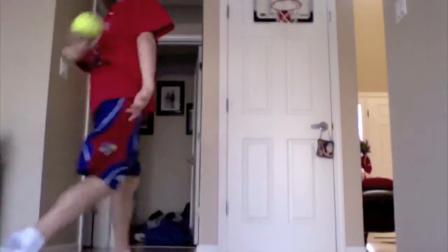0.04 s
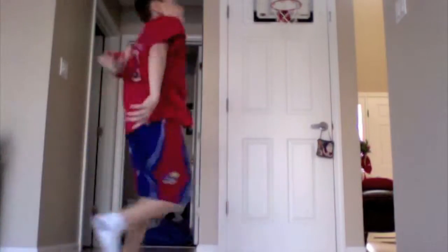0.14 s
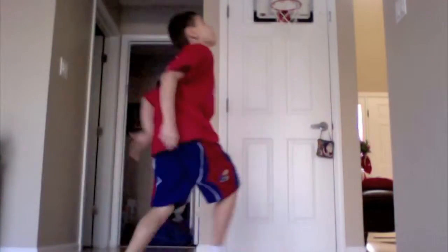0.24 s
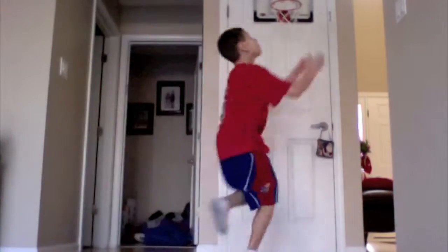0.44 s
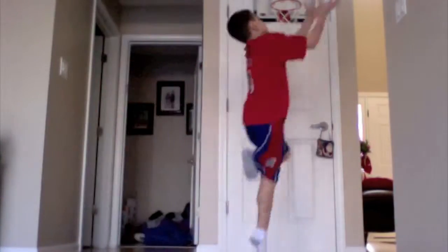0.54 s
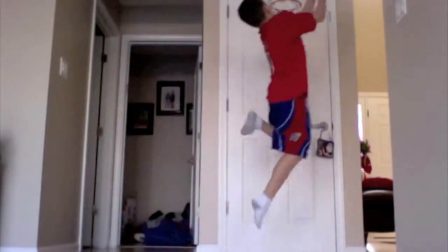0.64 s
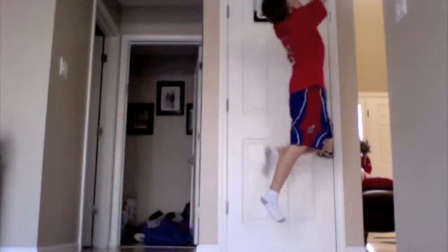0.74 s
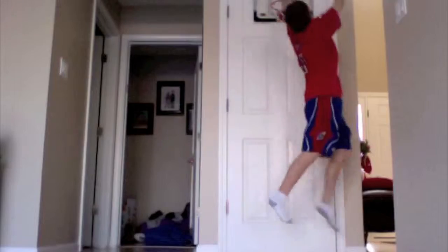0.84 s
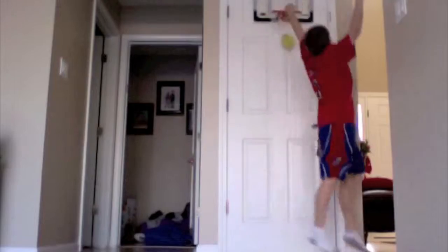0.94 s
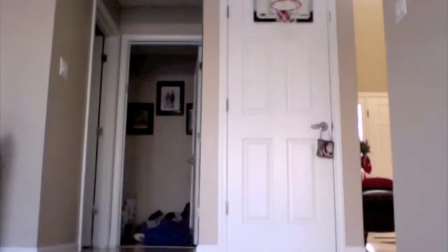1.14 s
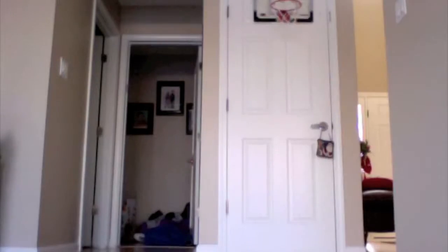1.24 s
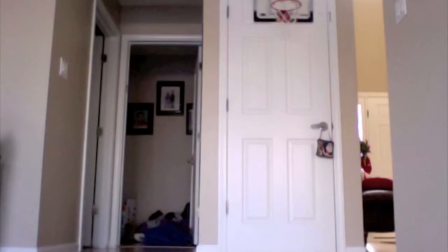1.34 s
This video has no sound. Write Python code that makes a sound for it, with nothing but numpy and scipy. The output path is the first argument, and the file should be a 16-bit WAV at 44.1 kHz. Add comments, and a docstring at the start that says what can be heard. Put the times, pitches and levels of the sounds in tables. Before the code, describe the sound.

Quick footfalls thump across floorboards, ending in a brief hoop rattle and a landing thud.

```python
"""Over a faint room tone, a boy in socks thuds up a wooden floor, jumps and dunks a small ball
into a hoop hung on a door. Each foot pushes the floorboards into ringing; the steel rim, backboard
and door rattle until he lands, and the hallway rings with every blow. Small squeaks, snaps and
knocks dot the action. It cuts off just after the landing and the quiet room fades back in,
with a faint hiss."""
import sys
import numpy as np
from scipy import signal
from scipy.fft import rfft, irfft, next_fast_len
from scipy.io import wavfile

SR = 44100
rng = np.random.default_rng(int(sys.argv[2]) if len(sys.argv) > 2 else 0)


def wav_record(signal):
    """Record a signal, one row per channel, as 16-bit PCM in the file named by sys.argv[1]."""
    frames = np.transpose(np.atleast_2d(signal))
    bounded = np.clip(frames, -1, 1)
    # unit amplitude maps onto the largest positive 16-bit level
    quanta = np.round(bounded * 32767).astype(np.int16)
    wavfile.write(sys.argv[1], SR, quanta)


N = 61739
T = np.arange(N) / SR

# room tone colour: f/Hz, level/dB
ROOM_EQ = [(25, -25), (50, -13), (90, -4), (210, 0.5), (265, -5.5), (320, -4.5), (400, -16), (650, -15),
           (900, -22.5), (2200, -26.5), (3100, -23), (4200, -30), (7000, -32.5), (10000, -43.5),
           (15000, -55)]
# room tone ride, ahead of the bed fader: t/s, level/dB
ROOM_RIDE = [(0, -64.5), (.4, -59.5), (.9, -65), (1.2, -51.5), (1.4, -52)]
# swells of hiss: t/s, length/s, level/dB, centre f/Hz, width/octaves
SWISH_CUES = [(0.146, 0.091, -74, 6930, 0.057), (0.259, .17, -76.5, 4530, 0.89),
              (0.524, 0.05, -62.5, 3000, .05), (0.532, .18, -66, 2780, 0.81),
              (1.118, 0.15, -56, 3350, 0.15), (1.178, .3, -62.5, 2430, 0.83), (1.219, .14, -60, 3000, 0.15),
              (1.344, 0.048, -57, 5060, 0.045)]
# hallway decay: f/Hz, t60/s
HALL_DECAY = [(60, 0.63), (200, 0.56), (600, 0.36), (2000, 0.41), (5000, 0.39), (10000, 0.17),
              (16000, 0.057)]
# soles slapping the boards: t/s, level/dB, low-pass f/Hz
SLAP_CUES = [(.150, -92, 3500), (.214, -41.5, 1190), (.240, -50.5, 2550), (0.254, -58, 7050),
             (0.271, -54, 7000), (0.41, -31.5, 1040), (0.4168, -32, 3260), (0.429, -38.5, 9200),
             (1.078, -38.5, 11900), (1.091, -52, 6000)]
# slap colour: f/Hz, level/dB
SOLE_EQ = [(100, -19.5), (600, 11), (1200, -3), (2000, -0.5), (3000, 3), (4200, -3.5), (7000, -3.5),
           (10000, -19), (15000, -46.5)]
# footfalls: t/s, level/dB, contact/s, patch of floor
THUDS = [(.153, -31.5, 0.0028, "run-up"), (0.188, -44, 0.0053, "run-up"), (0.2153, -24, 0.002, "run-up"),
         (0.226, -34.5, 0.0013, "run-up"), (.249, -26, 0.0063, "run-up"), (.416, -11.5, 0.0029, "take-off"),
         (0.4254, -14, .003, "take-off"), (.436, -15, 0.0047, "take-off"), (.572, -38, .008, "take-off"),
         (1.071, -15.5, 0.0017, "landing"), (1.0754, -5, 0.0018, "landing"),
         (1.095, -24.5, 0.0018, "landing")]
# floorboard modes under the run-up, at take-off and by the door: f/Hz, level/dB, t60/s
RUN_UP_MODES = [(61.7, -14.5, 0.15), (93.9, -5.5, 0.35), (118.5, -2, 0.23), (173.6, -1.5, .17),
                (314, -13.5, 0.16), (610, -35, 0.11)]
TAKE_OFF_MODES = [(72.2, -15, 0.63), (99.5, -15.5, 0.54), (112, -2, 0.11), (153.2, -1.5, 0.14),
                  (216.7, -13.5, 0.38), (284.1, -9, 0.32)]
LANDING_MODES = [(155.4, -5.5, 0.15), (201.5, 1.5, 0.066), (388, -14.5, 0.052), (450, -9, 0.033),
                 (570, -18, 0.074), (647, -18, 0.36)]
# colour of the hallway's boom on the steps and on the landing: f/Hz, level/dB
STEP_BOOM_EQ = [(30, -31.5), (60, -10.5), (105, 2), (170, -2), (290, -4), (380, -15), (650, -20),
                (1100, -43.5), (3000, -65)]
LANDING_BOOM_EQ = [(40, -33.5), (90, -15), (190, 11), (300, -15), (450, -3), (700, -2.5), (1000, -18),
                   (1400, -14), (3000, -35.5)]
# squeaks and snaps: t/s, level/dB, centre f/Hz, width/octaves, reverb send/dB
SNAP_CUES = [(.213, -42.5, 2900, 0.16, -26.5), (.252, -39, 3530, 0.092, -29),
             (0.256, -48.5, 1310, 0.12, -20), (0.272, -43, 1384, .06, -30), (0.413, -23.5, 2870, 0.16, -24),
             (0.4265, -33.5, 9500, 0.092, -28), (0.6592, -39, 7620, 0.13, -31.5),
             (0.664, -38, 4070, 0.88, -23.5), (1.0715, -23, 11300, 0.31, -31),
             (1.065, -27, 4250, 0.31, -20.5)]
# light knocks as he takes off: t/s, level/dB
KNOCK_CUES = [(.597, -46), (.659, -37.5)]
# knock colour: f/Hz, level/dB
KNOCK_EQ = [(50, -9), (110, 0.5), (300, -13), (420, -2.5), (750, -0.5), (1100, -13), (1750, -16.5),
            (4000, -23), (12000, -60)]
# ring of a knock: f/Hz, level/dB, t60/s
KNOCK_MODES = [(554, -3, 0.15), (785, -9.5, 0.21), (1714, -21.5, 0.32)]
# hoop on the door: t/s, clatter level/dB, board level/dB, rim level/dB, favoured board f/Hz
RATTLE_CUES = [(0.9591, -29, -31, -41, 630), (0.9697, -39, -28, -40, 450),
               (0.9831, -33.5, -27.5, -43.5, 402), (0.993, -43.5, -29.5, -43.5, 114),
               (1.009, -31, -47, -42.5, 174), (1.023, -34, -31, -43.5, 292), (1.034, -55, -36, -52.5, 575),
               (1.051, -35.5, -45, -60, 570), (1.066, -26, -37.5, -50, 256)]
# clatter colour: f/Hz, level/dB
CLATTER_EQ = [(60, -26), (150, 17), (350, 6), (650, 8.5), (1000, -1.5), (1600, 2.5), (3000, -1), (5200, -4),
              (8500, -8.5), (12000, -22.5), (15500, -37)]
# modes of backboard and door, and of the steel rim: f/Hz, level/dB, t60/s
BOARD_MODES = [(111, 2, 0.15), (178, 0, .12), (318.6, 5, .3), (447, 2, 0.098), (575, -14, 0.42),
               (630, -0.5, 0.14)]
RIM_MODES = [(1144, -10.5, 0.52), (1452, 5, .14), (1675, -1.5, 0.12), (1920, -4, 0.16), (2023, -7.5, 0.19),
             (2263, 1, .18), (2790, -11, 0.26), (3770, -11, 0.29), (4470, -11.5, 0.27), (5090, -7, 0.24),
             (5950, -5.5, 0.15), (6640, -18.5, 0.17), (7600, -8, 0.077)]
# faders that cut the action off and briefly duck the quiet bed: t/s, level/dB
ACTION_FADER = [(1.10, -3), (1.12, -16), (1.128, -39), (1.14, -85)]
BED_FADER = [(1.11, 2.5), (1.13, -20.5), (1.155, -8), (1.2, -4.5)]

CONTACT_RISE_S, HALL_BUILD_S = 0.00066, 0.0027
GRIT_DB, GRIT_GRAIN_S = 3.5, 0.0007


def amp(db):
    """Decibels to gain."""
    return 10 ** (np.asarray(db) / 20)


def unit(x):
    """Scales to rms 1."""
    return x / np.sqrt(np.mean(x ** 2) + 1e-20)


def read(points, hz):
    """Reads a table on a log-frequency axis."""
    f, value = np.transpose(points)
    return np.interp(np.log(hz + 1), np.log(f + 1), value)


def fader(points):
    """Gain over time from points of t/s, level/dB."""
    return amp(np.interp(T, *np.transpose(points)))


def add(mix, s, sound):
    """Mixes a sound in at time s."""
    part = mix[max(round(s * SR), 0):][:len(sound)]
    part += sound[:len(part)]


def cut(x, hz, kind, order=3):
    """Low-pass or high-pass."""
    return signal.sosfilt(signal.butter(order, hz, kind, fs=SR, output="sos"), x)


def noise(eq, envelope=1):
    """Enveloped noise through a minimum-phase EQ, so nothing rings ahead of an attack."""
    size = next_fast_len(N + SR // 4, True)
    hz = abs(np.fft.fftfreq(size, 1 / SR))
    log_gain = np.log(unit(amp(np.maximum(read(eq, hz), -100))))
    response = np.conj(np.exp(signal.hilbert(log_gain)))[:size // 2 + 1]
    white = rng.standard_normal(N) * envelope
    return irfft(rfft(white, size) * response, size)[:N]


def bell(centre_hz, octaves):
    """EQ curve with a single peak."""
    hz = np.geomspace(20, SR / 2, 600)
    offset = np.log2(hz / centre_hz) / octaves
    return np.c_[hz, -40 * np.log10(1 + offset ** 2 / 2)]


def attack(rise_s):
    """Exponential rise from silence."""
    return 1 - np.exp(-T / rise_s)


def decay(t60):
    """Falls 60 dB in t60 seconds."""
    return np.exp(-np.log(1000) * T / t60)


def ring(modes):
    """Struck modes dying away."""
    return sum(amp(db) * decay(t60) * np.sin(2 * np.pi * hz * T) for hz, db, t60 in modes)


def room_tone():
    """A dark bed of air that drifts in level."""
    return noise(ROOM_EQ) * fader(ROOM_RIDE)


def swishes(fade_s=0.0066):
    """Faint bands of hiss that fade in, hold and fade out."""
    out = np.zeros(N)
    for s, length, db, hz, octaves in SWISH_CUES:
        swell = np.clip(np.minimum(T, length - T) / fade_s, 0, 1)
        add(out, s, amp(db) * swell * noise(bell(hz, octaves)))
    return cut(out, 9500, "lowpass")


def hallway(eq):
    """The hallway's answer to a blow: the tail builds quickly and its top end dies first."""
    hz, t, spectrum = signal.stft(noise(eq), SR, nperseg=512)
    damping = amp(-60 * t / read(HALL_DECAY, hz)[:, None])
    tail = signal.istft(spectrum * damping, SR, nperseg=512)[1][:N]
    return tail * attack(HALL_BUILD_S)


def contact(eq, t60, send_db):
    """Two surfaces meet: a gritty noise transient with its hallway tail."""
    flutter = np.interp(T / GRIT_GRAIN_S, np.arange(N), rng.standard_normal(N))
    envelope = unit(amp(GRIT_DB * flutter)) * decay(t60) * attack(CONTACT_RISE_S)
    return noise(eq, envelope) + amp(send_db) * hallway(eq)


def sole_slaps():
    """Socked soles slap the boards, some muffled, some bright."""
    out = np.zeros(N)
    for s, db, top_hz in SLAP_CUES:
        slap = contact(SOLE_EQ, t60=0.086, send_db=-4)
        add(out, s, amp(db) * cut(slap, top_hz, "lowpass"))
    return out


def footfalls(patch, modes, boom_eq, boom_db):
    """Feet push one patch of boards and the hallway booms; longer contact dulls the thud."""
    out, boards = np.zeros(N), ring(modes)
    for s, db, contact_s, where in THUDS:
        if where == patch:
            push = np.sin(np.pi * np.minimum(T / contact_s, 1))[:SR // 20] ** 2
            thud = -signal.fftconvolve(boards, push / push.sum())[:N]
            boom = amp(boom_db) * hallway(boom_eq)
            add(out, s, amp(db) * (thud + boom))
    return out


def snaps():
    """Small squeaks and sharp snaps: very short, nearly dry bursts around one pitch."""
    out = np.zeros(N)
    for s, db, hz, octaves, send_db in SNAP_CUES:
        add(out, s, amp(db) * contact(bell(hz, octaves), t60=0.012, send_db=send_db))
    return out


def knocks():
    """Dull little knocks at take-off, each with a short ring."""
    out = np.zeros(N)
    for s, db in KNOCK_CUES:
        knock = contact(KNOCK_EQ, t60=0.037, send_db=-8) + ring(KNOCK_MODES)
        add(out, s, amp(db) * knock)
    return out


def steel_rim():
    """One clang of the rim: every blow starts its modes at new phases."""
    clang = sum(amp(db) * decay(t60) * np.sin(2 * np.pi * (hz * T + rng.random()))
                for hz, db, t60 in RIM_MODES)
    return clang * attack(CONTACT_RISE_S)


def hoop_rattle():
    """The dunked rim chatters against backboard and door; each hit favours other board modes."""
    out = np.zeros(N)
    for s, clatter_db, board_db, rim_db, favoured_hz in RATTLE_CUES:
        emphasis = bell(favoured_hz, octaves=0.34)
        board = ring([(hz, db + read(emphasis, hz), t60) for hz, db, t60 in BOARD_MODES])
        clatter = contact(CLATTER_EQ, t60=0.086, send_db=-6)
        add(out, s, amp(clatter_db) * clatter + amp(board_db) * board + amp(rim_db) * steel_rim())
    return out


def scene():
    """Run-up, jump, dunk and a tight landing, cut short over the quiet bed."""
    bed = room_tone() + swishes()
    run_up = footfalls("run-up", RUN_UP_MODES, STEP_BOOM_EQ, boom_db=-18.5)
    take_off = footfalls("take-off", TAKE_OFF_MODES, STEP_BOOM_EQ, boom_db=-10.5)
    landing = footfalls("landing", LANDING_MODES, LANDING_BOOM_EQ, boom_db=-15.5)
    tight_landing = cut(landing, 114, "highpass", order=2)
    action = sole_slaps() + run_up + snaps() + take_off + knocks() + hoop_rattle() + tight_landing
    return (action * fader(ACTION_FADER) + bed * fader(BED_FADER))[None]


def record(dry):
    """A small microphone: no deep bass and a steep roll-off at the very top."""
    thin = cut(dry, 52, "highpass", order=6)
    top_cut = signal.firwin(511, 15650, window=("kaiser", 9), fs=SR)
    return signal.oaconvolve(thin, top_cut[None], "same")


dry = scene()
out = record(dry)
wav_record(out)
```